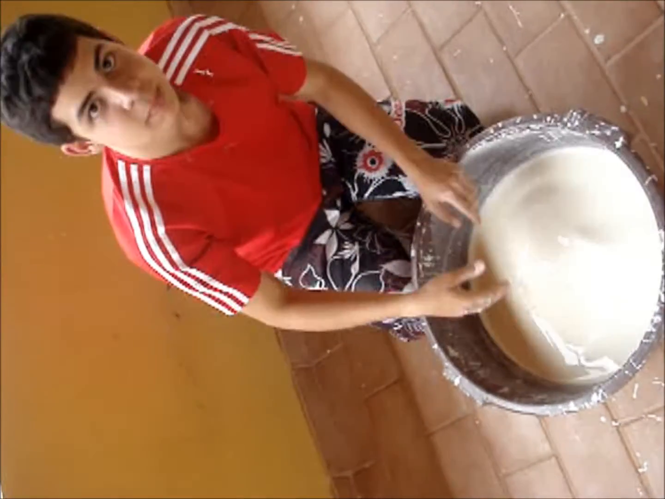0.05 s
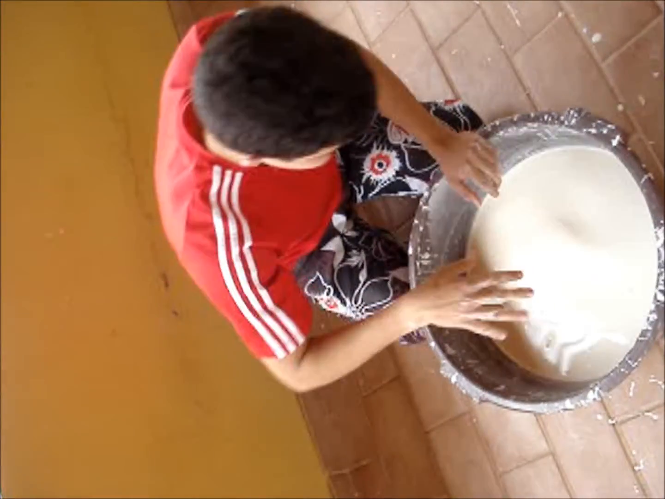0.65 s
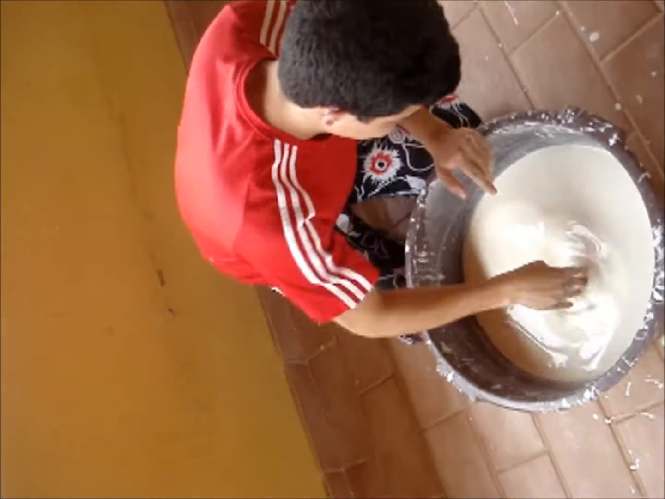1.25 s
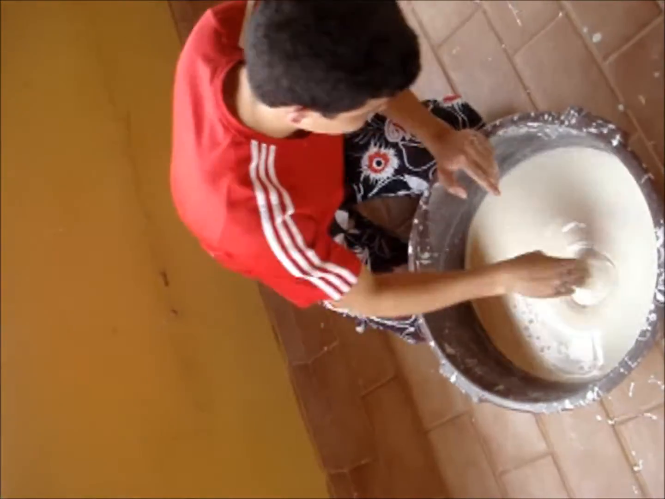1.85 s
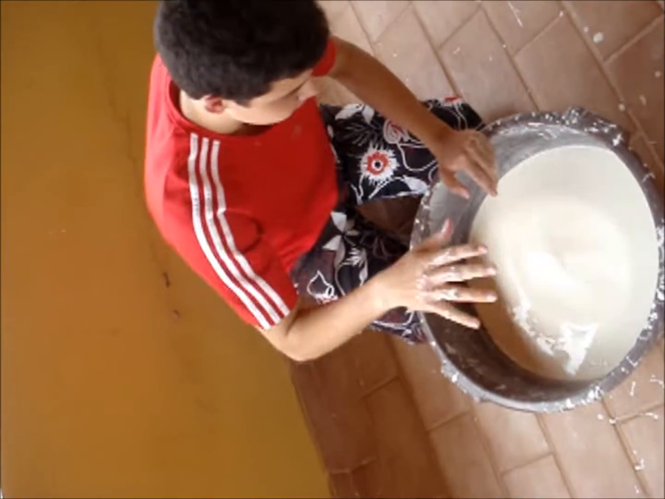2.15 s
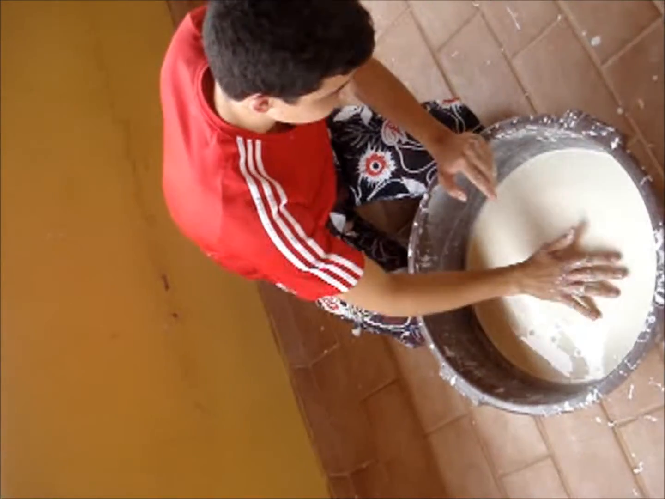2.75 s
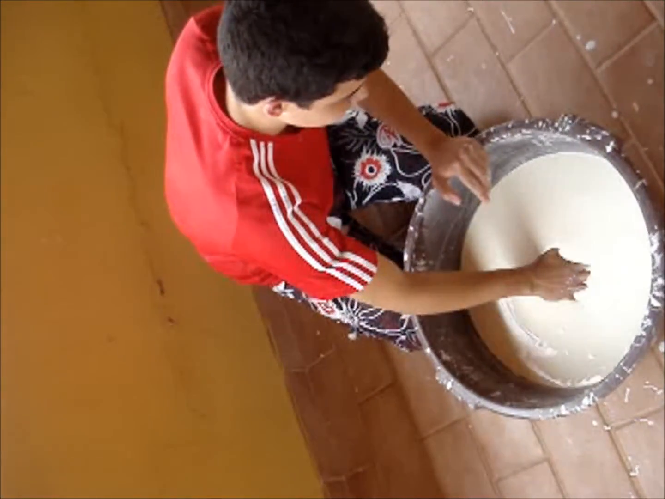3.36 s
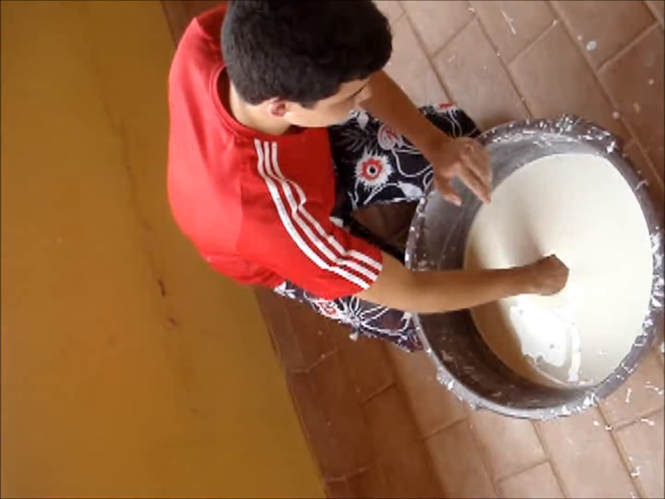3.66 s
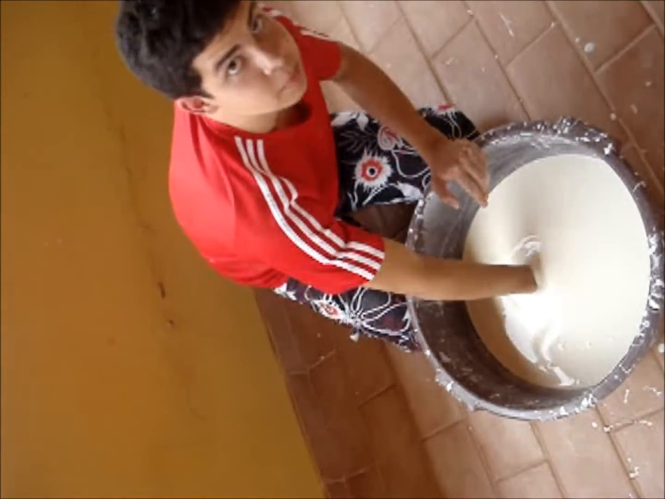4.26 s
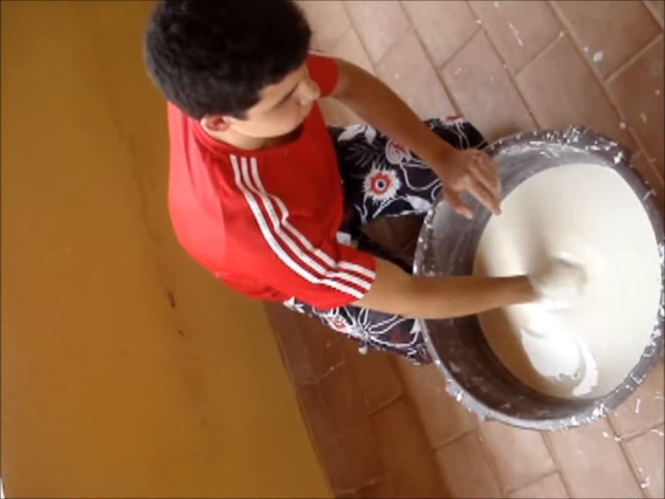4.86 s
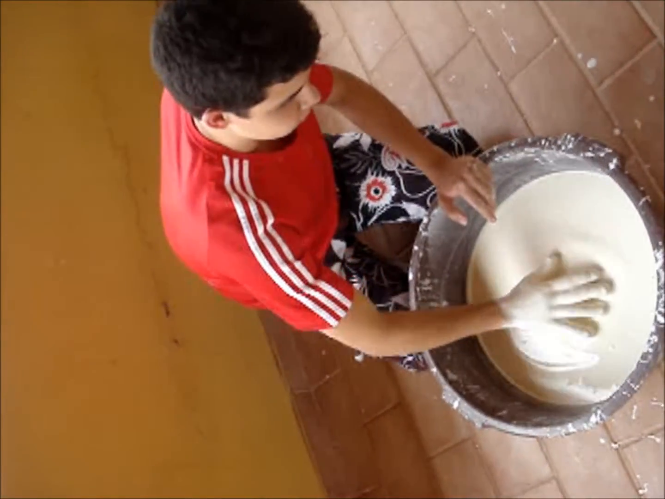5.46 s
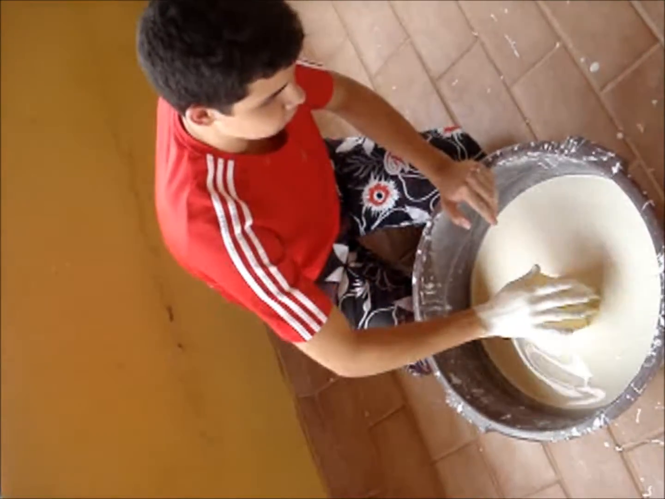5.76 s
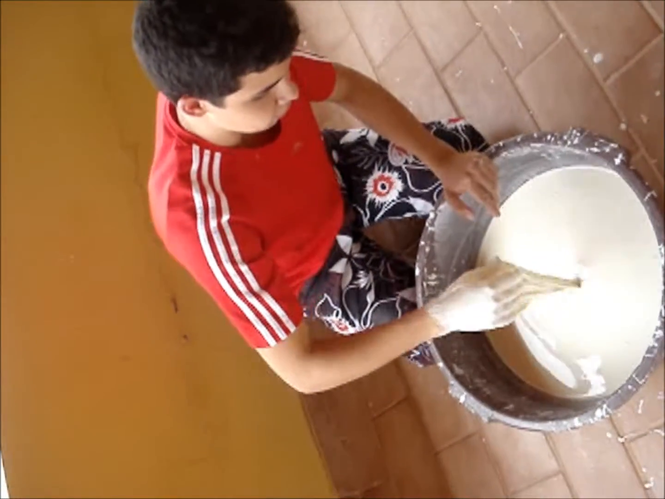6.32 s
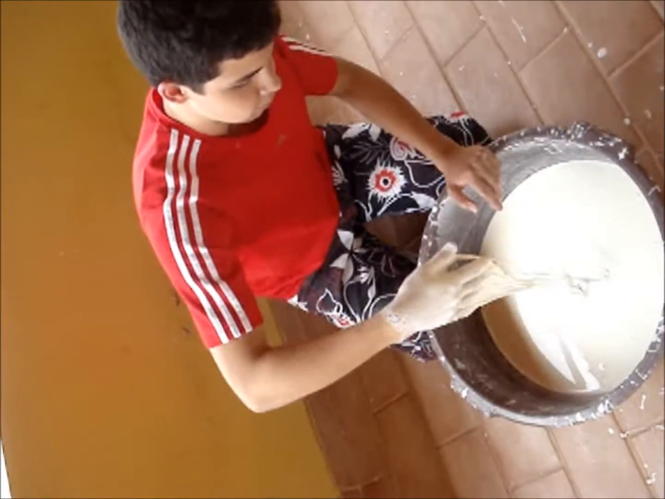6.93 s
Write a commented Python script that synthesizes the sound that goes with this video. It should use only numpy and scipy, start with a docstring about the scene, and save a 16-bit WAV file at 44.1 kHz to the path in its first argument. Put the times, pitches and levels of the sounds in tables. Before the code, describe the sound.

Four quick wet smacks with little air pops on cornstarch paste ring briefly in a yard, followed by faint birdsong.

```python
"""A tiled yard with hard walls, on one microphone. A hand slaps stiff cornstarch paste four times
in a metal basin: each slap is a wet smack, then air popping out from under the palm, and basin
and yard ring briefly. In the distance one bird whistles falling notes and two smaller ones chirp
and pip, over a faint outdoor hush and a low drone."""
import sys
import numpy as np
from scipy import signal
from scipy.fft import rfft, irfft, next_fast_len
from scipy.io import wavfile
from scipy.ndimage import map_coordinates

SR = 44100
rng = np.random.default_rng(int(sys.argv[2]) if len(sys.argv) > 2 else 0)


def output_pcm(signal):
    """Save a mono or channel-first signal as 16-bit PCM at the path in sys.argv[1].

    Samples are clipped to [-1, 1] before scaling.
    """
    pcm = np.clip(np.atleast_2d(signal).T, -1, 1) * 32767
    wavfile.write(sys.argv[1], SR, np.round(pcm).astype(np.int16))


N = 312669


def slaps(hand_parts=4):
    """The parts of the hand land in turn; the paste locks solid and passes the blow to the basin."""
    # hand meets paste: start_s, smack_relative_db, full_contact_s, thud_relative_db
    blows = [(0.9004, -31.5, 0.0061, -31), (1.2218, -21.5, 0.0044, -29), (1.5180, -24.5, .0058, -35),
             (1.7831, -25.5, 0.0063, -30)]
    # spectrum of the wet smack: frequency_hz, density_db
    smack_spectrum = [(40, -33), (150, -18), (320, 3), (480, 6), (700, -1.5), (1080, 3.5), (1500, -5.3),
                      (2100, -4.5), (3400, -8.5), (4600, -16.5), (6500, -24), (10000, -38.5)]
    out, t = np.zeros(N), np.arange(SR // 4) / SR
    for start_s, smack_db, contact_s, thud_db in blows:
        for lag_s in np.linspace(0, contact_s, hand_parts):  # each sprays sound toward different walls
            contact = amp(smack_db + 1.92 * wobble(672, len(t))) * swell(t / contact_s) ** 2.53
            smack = contact * noise(smack_spectrum, len(t)) / np.sqrt(hand_parts)
            add(out, start_s + lag_s, smack)
            add(out, start_s + lag_s, amp(-11) * near_walls(smack))
            add(out, start_s + lag_s, amp(-3.5) * yard(smack, build_s=0.0044))
        ring = filtered(signal.unit_impulse(len(t)), basin)
        thud = amp(thud_db + 11.5) * ring / np.abs(ring).max()
        thud *= 1 - np.exp(-t / 0.0027)  # soft flesh takes a moment to load the basin
        add(out, start_s + contact_s, thud)
        add(out, start_s + contact_s, amp(2.5) * yard(thud, build_s=0.009, stretch=0.7))
    return out


def pops():
    """Each trapped air pocket rings briefly, sagging in pitch; the basin colours the yard's answer."""
    # air squeezed out under the hand: start_s, settled_pitch_hz, level_db
    pockets = [(.9085, 950, -25), (0.914, 1090, -28.5), (.9195, 515, -25.5), (0.931, 820, -30.5),
               (1.2265, 910, -19), (1.2322, 1004, -10), (1.236, 530, -23.5), (1.5285, 926, -24),
               (1.531, 477, -25), (1.5345, 980, -21.5), (1.790, 546.6, -23.5), (1.7942, 1060, -22.5),
               (1.797, 472, -20.5), (1.820, 1060, -26.5)]
    swell_cycles, puff_peak_s = 1.61, 0.0049
    out, t = np.zeros(N), np.arange(SR // 8) / SR
    for start_s, pitch_hz, level_db in pockets:
        swell_s = swell_cycles / pitch_hz  # big, low pockets take longer to swell
        sagging_hz = pitch_hz * (1 + 0.045 * np.exp(-t / swell_s))
        pop = amp(level_db) * swell(t / swell_s) ** 1.46 * tone(sagging_hz)
        puff = amp(2 * level_db - 22) * swell(t / puff_peak_s) ** 2  # one low push of escaping air
        add(out, start_s, pop + puff)
        add(out, start_s, amp(-7) * near_walls(pop))
        add(out, start_s, amp(-5) * yard(filtered(pop, basin), build_s=0.0021))
    return out


def basin(hz):
    """Frequency response of the metal basin, its modes damped by the paste."""
    # modes of the filled basin: pitch_hz, width_hz, level_db
    modes = [(296, 26, -4.5), (432, 130, -2), (570, 87, -4), (630, 25, -8), (782, 31, 1), (892, 40, -1),
             (1073, 38.5, -3), (1280, 35, -12), (1880, 100, -10), (2320, 49, -21)]
    return sum(amp(level_db) * 1j * hz * width_hz / (pitch_hz ** 2 - hz ** 2 + 1j * hz * width_hz)
               for pitch_hz, width_hz, level_db in modes)


def near_walls(x, count=8):
    """Early echoes off the tiles, the seated person and the nearest wall thicken the first instants."""
    taps = np.zeros(SR // 10)
    delay_s = rng.uniform(0.0071, 0.033, count)
    taps[(delay_s * SR).astype(int)] = rng.choice([-1, 1], count) * np.exp(-delay_s / 0.02)
    return signal.fftconvolve(x, taps / np.linalg.norm(taps))


def yard(x, build_s, stretch=1):
    """The hard walls' answer to a sound: it builds up, then dies away, faster in the treble."""
    # time the yard takes to fall 60 dB, at a stretch of 1: frequency_hz, decay_s
    decay_times = [(150, 0.99), (400, 0.5), (1040, 0.54), (2760, 0.43), (7280, 0.39)]
    hz, t, bands = signal.stft(rng.standard_normal(SR * 3 // 4), SR, nperseg=256)
    decay_s = stretch * along(decay_times, hz)[:, None]
    _, tail = signal.istft(bands * amp(-60 * t / decay_s), SR, nperseg=256)
    tail *= 1 - np.exp(-(np.arange(len(tail)) / SR / build_s) ** 2)
    return signal.fftconvolve(x, tail / np.linalg.norm(tail))


def birds():
    """Three distant birds, reaching the microphone mostly by way of the walls."""
    # one bird's falling whistles: start_s, length_s, start_hz, end_hz, bend, relative_db
    whistles = [(2.352, .22, 3540, 2310, 2, -62.5), (3.503, 0.31, 2862, 1963, 0.18, -48.5),
                (4.007, 0.3, 3330, 1906, 2.4, -48.5), (4.404, .31, 3598, 2355, .7, -44),
                (4.821, 0.2, 2717, 2630, 0.27, -64)]
    # a small bird's chirp, which starts level and then plunges: start_s, relative_db
    chirps = [(.315, -58), (1.11, -58.5), (2.04, -67), (2.844, -54), (3.545, -57), (4.372, -55),
              (5.25, -56), (5.466, -61), (6.04, -58), (6.555, -54)]
    # another's thin rising pips, two at a time: start_s, relative_db
    pip_pairs = [(0.716, -61.5), (3.2, -57.5), (4.001, -59), (4.83, -55), (6.067, -56.5)]
    out, pip_gap_s = np.zeros(N), 0.126
    for start_s, length_s, start_hz, end_hz, bend, db in whistles:
        whistle = amp(db) * bird_note(length_s, start_hz, end_hz, bend, peak_at=0.24, waver=0.0246)
        add(out, start_s, whistle)
        add(out, start_s, amp(3) * yard(whistle, build_s=0.0042, stretch=1.4))
    for start_s, db in chirps:
        chirp = bird_note(0.079, start_hz=4940, end_hz=3115, bend=-1.6, peak_at=0.44, waver=0.0517)
        add(out, start_s, amp(db - 3.5) * chirp)
        add(out, start_s, amp(db - 1) * yard(chirp, build_s=0.0042, stretch=1.03))
    for pair_s, db in pip_pairs:
        for start_s in (pair_s, pair_s + pip_gap_s):
            pip = bird_note(0.03, start_hz=5360, end_hz=5820, bend=0.88, peak_at=0.28, waver=0.022)
            add(out, start_s, amp(db - 1.5) * pip)
            add(out, start_s, amp(db + 1.5) * yard(pip, build_s=0.0023, stretch=0.8))
    return out


def bird_note(length_s, start_hz, end_hz, bend, peak_at, waver):
    """A fluttering pure tone; its glide levels off if bend is positive and steepens if negative."""
    flutter_db, flutter_per_s = 2.5, 110.8
    size = int(length_s * SR)
    progress = np.linspace(0, 1, size)
    glide = np.expm1(-bend * progress) / np.expm1(-bend)
    pitch_hz = (start_hz + (end_hz - start_hz) * glide) * (1 + waver * wobble(183.3, size))
    flutter = amp(flutter_db * (wobble(flutter_per_s, size) - 0.5))
    envelope = swell(progress / peak_at) * signal.windows.tukey(size, 0.2)
    return envelope * flutter * tone(pitch_hz)


def hush():
    """Far-off rumble and a smooth hiss, rising a little at first and then steady."""
    # the outdoor background: frequency_hz, density_db
    spectrum = [(20, -20), (35, -17), (60, -7.5), (85, -12), (120, -7), (160, -4.5), (250, -3), (360, -2),
                (520, -3.5), (720, -5), (1600, -10), (4600, -16), (6200, -18.5), (10000, -25.5)]
    settle_s, crossover_hz = 2.3, 1500
    rise_db = 2.5 * np.minimum(np.arange(N) / SR / settle_s - 1, 0)
    low_share = lambda hz: 1 / (1 + (hz / crossover_hz) ** 8)
    rumble = unit(filtered(noise(spectrum, N), lambda hz: np.sqrt(low_share(hz))))
    hiss = unit(filtered(noise(spectrum, N), lambda hz: np.sqrt(1 - low_share(hz))))
    return rumble * amp(-57 + rise_db + 0.27 * wobble(7.8, N)) + hiss * amp(-60 + 0.58 * rise_db)


def drone():
    """A faint low drone in the distance, swelling as it slowly comes closer."""
    # the drone's two low humps: frequency_hz, density_db
    spectrum = [(30, -30), (60, 0), (85, -11), (120, 4.5), (160, -17), (300, -39)]
    start_db, rise_db_per_s = -79.5, 1.6
    return amp(start_db + rise_db_per_s * np.arange(N) / SR) * noise(spectrum, N)


def amp(db):
    """Decibels to gain."""
    return 10 ** (np.asarray(db) / 20)


def unit(x):
    """Scale to rms 1."""
    return x / np.sqrt(np.mean(x ** 2) + 1e-20)


def along(points, hz):
    """Read (frequency_hz, value) points on a log frequency axis."""
    points_hz, values = np.transpose(points)
    return np.interp(np.log(hz + 1), np.log(points_hz + 1), values)


def filtered(x, response):
    """Pass x through a response given as a function of frequency."""
    size = next_fast_len(len(x) + SR // 2)
    hz = np.fft.rfftfreq(size, 1 / SR)
    return irfft(rfft(x, size) * response(hz), size)[:len(x)]


def noise(spectrum, size):
    """Coloured noise of rms 1."""
    return unit(filtered(rng.standard_normal(size), lambda hz: amp(along(spectrum, hz))))


def tone(pitch_hz):
    """A sine that follows a pitch curve."""
    return np.sin(2 * np.pi * np.cumsum(pitch_hz) / SR)


def wobble(knots_per_s, size):
    """A smooth random curve."""
    knots = rng.standard_normal(int(size * knots_per_s / SR) + 4)
    return map_coordinates(knots, [np.arange(size) * knots_per_s / SR])


def swell(u):
    """Rises to 1 at u = 1 and dies away."""
    u = np.maximum(u, 0)
    return u * np.exp(1 - u)


def add(track, start_s, sound):
    """Mix a sound into the track."""
    part = track[round(start_s * SR):]
    part[:len(sound)] += sound[:len(part)]


def scene():
    """Slaps, birds and background as they meet at the microphone, in one channel."""
    return (slaps() + pops() + birds() + hush() + drone())[None]


def record(dry):
    """The microphone's channel cuts off steeply in the high treble."""
    top_hz = 10050
    return np.array([filtered(x, lambda hz: 1 / np.sqrt(1 + (hz / top_hz) ** 200)) for x in dry])


dry = scene()
out = record(dry)
output_pcm(out)
```